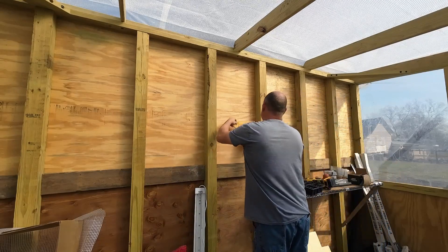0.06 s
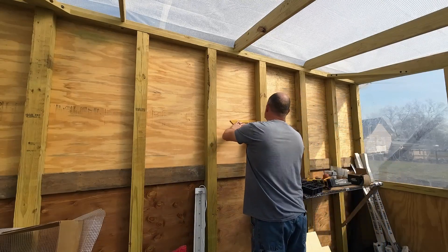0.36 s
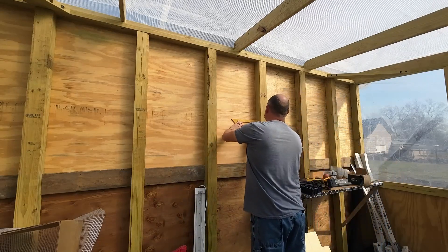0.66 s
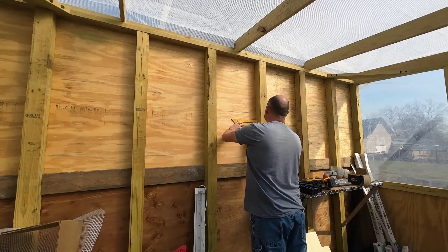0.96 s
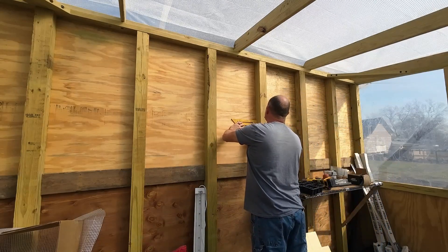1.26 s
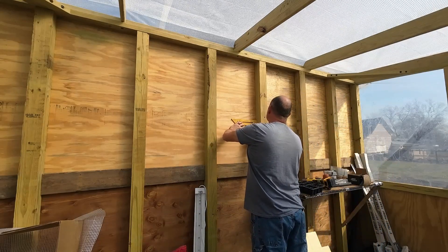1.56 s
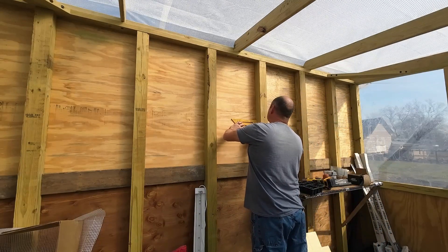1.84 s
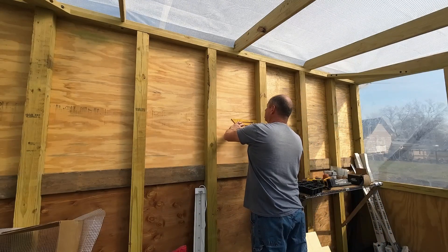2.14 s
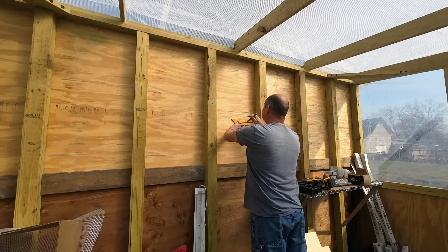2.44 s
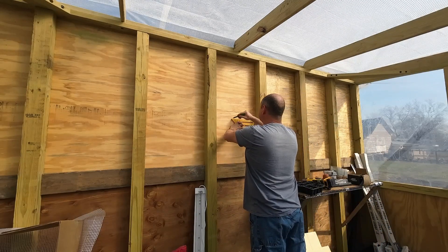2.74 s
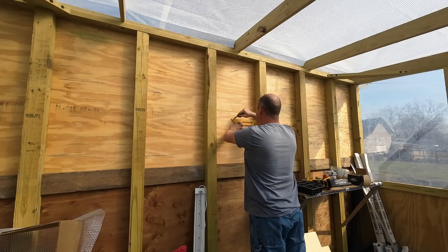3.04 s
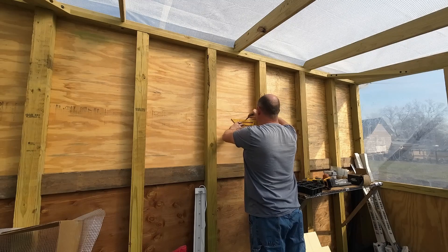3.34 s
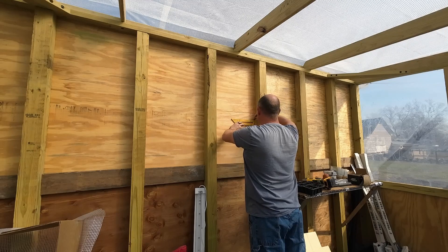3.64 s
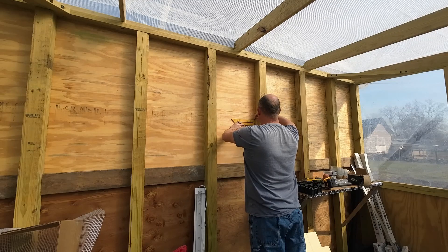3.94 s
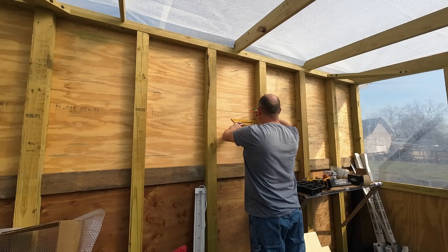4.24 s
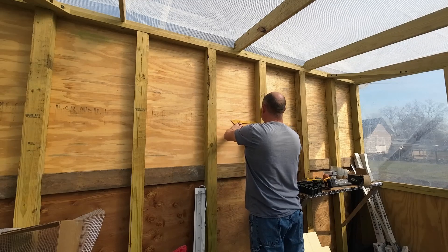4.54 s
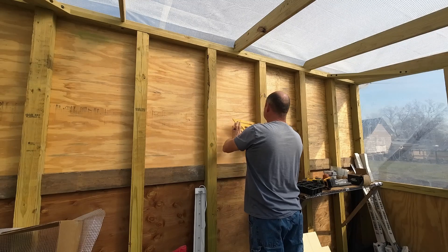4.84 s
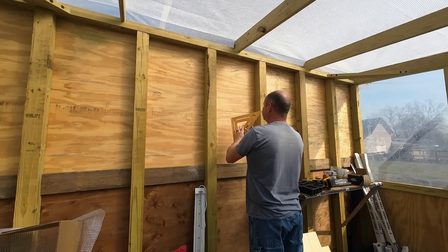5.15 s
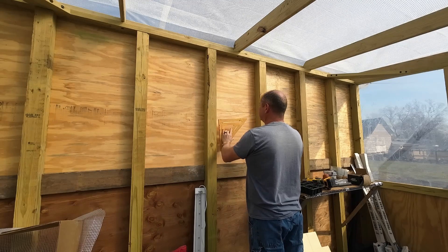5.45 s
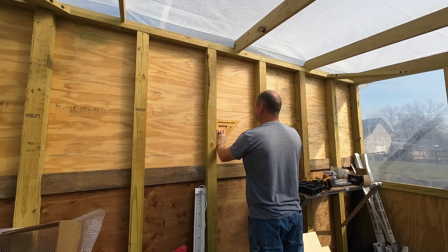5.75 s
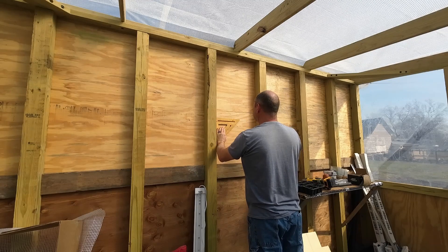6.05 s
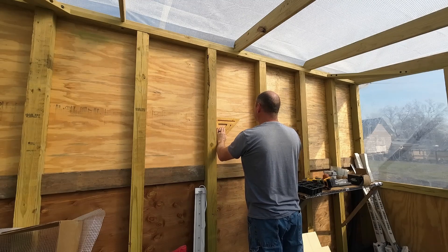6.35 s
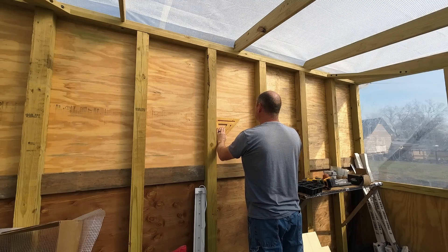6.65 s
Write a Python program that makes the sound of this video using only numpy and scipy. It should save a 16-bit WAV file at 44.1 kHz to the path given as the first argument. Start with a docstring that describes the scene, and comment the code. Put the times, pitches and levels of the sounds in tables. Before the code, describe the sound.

In a small timber greenhouse, heard a few metres from the wall, tools knock and bounce against plywood in two loud bursts, one at the start and one near the end. Between them are light ticks, gentler knocks, a short rasping marker stroke and dry rubs of a tool sliding over the wood. The room rings only briefly. A soft rumble and very faint bird whistles come in from outside.

```python
"""Hand tools knock and clatter on a plywood wall that is being marked out in a small greenhouse.
Each impact excites the damped modes of panel and tool, and the timber room reverberates briefly.
A marker scrapes along the wall and tools slide over it by stick-slip friction; they also tick and
rustle when handled. A low outdoor rumble and faint birds come through the plastic sheeting."""
import sys
import numpy as np
from scipy import signal
from scipy.fft import rfft, irfft, next_fast_len
from scipy.io import wavfile

SR = 44100
rng = np.random.default_rng(int(sys.argv[2]) if len(sys.argv) > 2 else 0)


def waveform_to_disk(signal):
    """Save audio, clipped to [-1, 1], as 16-bit WAV at the path in sys.argv[1]."""
    frames = np.transpose(np.atleast_2d(signal))
    scaled = np.clip(frames, -1, 1) * 32767
    samples = np.round(scaled).astype(np.int16)
    wavfile.write(sys.argv[1], SR, samples)


N = 299865
TIME = np.arange(N) / SR
RING_TIME = TIME[:SR * 4 // 5]  # 0.8 s for a free decay
TOP_HZ = 15800


# impacts on the wall: tools striking, a hand landing (0.503 s) and the marker catching during its stroke
# (3.156-3.475 s): t/s, level/dB, contact cutoff f/Hz, favoured panel f/Hz, weight/dB, favoured tool f/Hz
IMPACTS = [ (0.3971, 11.5, 2570, 520, 2, 2400), (0.414, 20, 5740, 770, 0.5, 2520),
           (0.4412, -2, 3960, 910, 12.5, 3000), (0.4657, 7.5, 5860, 430, 8, 3700),
           (0.4683, 14.5, 2280, 277, -0.5, 3440), (0.4731, 18, 1090, 410, -0.5, 1900),
           (0.503, 10, 300, 300, 6.5, 1900), (0.5487, 6, 910, 452, -1.5, 1900),
           (2.903, -11.5, 4000, 1177, 6.5, 3400), (2.949, 1, 1600, 1100, 4.5, 2000),
           (3.156, -8, 1820, 1120, 6.5, 1900), (3.194, -15, 2385, 504, -1, 4000),
           (3.2198, 8.5, 387, 264, -1.5, 1900), (3.259, -12, 2500, 900, 11.5, 2400),
           (3.289, -12.5, 2740, 1430, 10, 2900), (3.417, -4, 995, 458, 4, 1900),
           (3.475, -10, 1240, 620, 12, 1900), (3.895, -33, 1800, 450, 11, 2376),
           (4.042, -16, 1780, 533, 8.5, 2400), (4.176, -23, 2400, 366, 15, 2400),
           (4.574, 5, 79, 64, 8.5, 1900), (4.736, -15.5, 2380, 471, 9.5, 3400),
           (5.252, -22, 2000, 1000, 8, 2425), (5.6514, 16.5, 1400, 940, 0, 1950),
           (5.674, -2, 3200, 423, 0, 1950), (5.695, 2.5, 400, 420, 6, 1900),
           (5.712, 3, 2000, 470, 9.5, 3400), (5.7368, 22, 595, 527, -15, 1890),
           (5.7404, 6.5, 2520, 673, -6, 3200), (5.752, 7.5, 1920, 514, 1, 3700),
           (5.7625, 5, 784, 600, 10.5, 1900), (5.7778, -3, 3580, 700, 2, 4400)]

def knocks(lowest_hz=55):
    """Impact trains: tools land, bounce and settle, a hand lands and the marker catches; the panel radiates
    little below its lowest mode."""
    out = np.zeros(N)
    for start, *contact in IMPACTS:
        add(out, start, impact(*contact))
    return signal.sosfilt(signal.butter(2, lowest_hz, "high", fs=SR, output="sos"), out)


# modes of the plywood between its studs, and of the tool: f/Hz, level/dB, T60/s before the damping limit
PANEL_MODES = [(61.54, -55, 0.48), (89, -49.5, 0.42), (127, -49.5, 0.18), (165, -56.5, 0.19),
               (276, -48.5, 0.26), (342, -59.5, 0.57), (431, -40, 0.091), (475, -50, 0.099),
               (573, -36.5, 0.023), (634, -56.5, 0.12), (750, -46, 0.1), (803.4, -57, 0.19),
               (905, -54, 0.3), (1051.4, -38.5, 0.015), (1107, -55, 0.54), (1383, -51.5, 0.3),
               (1770, -56.5, 0.17), (1865, -49.5, 0.094)]
TOOL_MODES = [(1898, -46, 0.085), (1960, -42, 0.08), (2356, -38, 0.1), (2483, -44, 0.1), (2615, -45, 0.1),
              (2985, -46, 0.097), (3170, -46, .04), (3398, -48, 0.11), (3680, -49, 0.09), (3990, -45, 0.06),
              (4733, -48, .08)]
# radiation of the panel from a sharp contact: f/Hz, level/dB
CRACK_SPECTRUM = [(40, -21), (120, 1), (260, -0.5), (360, -9), (470, -0.5), (1000, 1.5), (1400, -1.5),
                  (2400, 1.5), (4000, -0.5), (6000, -7), (9500, -6), (12000, -20), (15000, -24)]
# early reflections from studs and roof: delay/s, amplitude ratio
REFLECTIONS = [(.0029, 0.24), (.0062, 0.58), (.0083, .25)]

def impact(db, contact_hz, spot_hz, weight_db, tool_hz, shadow_hz=5600):
    """Impulse excitation: a crack plus panel and tool modes; a softer contact passes less treble."""
    arrivals = np.zeros(len(RING_TIME))
    arrivals[0] = 1
    for delay, gain in REFLECTIONS:
        arrivals[int(delay * SR)] += gain
    # the worker's body shadows the contact, so its treble arrives mostly by way of the room
    shadowed = lowpass(arrivals, shadow_hz, order=4)
    crack = undb(-3) * shadowed + undb(-4) * burst(t60=0.042) + undb(-6) * room_response()
    crack = crack + undb(-1) * band(crack, spot_hz, spot_hz / 3, order=1)  # the spot's broad resonance
    thud_db = 1.5 * (np.array(PANEL_MODES)[:, 0] < 220)  # extra drive for the lowest modes
    panel = ring(PANEL_MODES, coupling_db(PANEL_MODES, spot_hz) + weight_db + thud_db)
    tool_drive_db = -20 + 1.0073 * db  # the harder the blow, the greater the tool's share
    tool = ring(TOOL_MODES, coupling_db(TOOL_MODES, tool_hz) + tool_drive_db)
    return undb(db) * lowpass(colour(crack, CRACK_SPECTRUM) + panel + tool, contact_hz)


def coupling_db(modes, near_hz, peak_db=6):
    """Modal coupling: a contact drives the modes near one frequency most strongly."""
    octaves = np.log2(np.array(modes)[:, 0] / near_hz)
    return peak_db * np.exp(-(2 * octaves) ** 2)


def ring(modes, extra_db):
    """Modal superposition: damped sinusoids from one push, with neighbours in opposite phase."""
    hz, db, t60 = np.transpose(modes)
    gains = undb(db + extra_db) * (-1) ** np.arange(len(modes))
    t60 = np.minimum(t60, 6.5 / np.sqrt(hz))  # damping limit: wood and plastic cannot hold a high note
    return sum(g * decay(t) * np.sin(2 * np.pi * f * RING_TIME) for f, g, t in zip(hz, gains, t60))


# a tool's edge skids after landing: t/s, duration/s, level/dB, f/Hz
EDGE_SKIDS = [(0.411, 0.034, -34.5, 5140), (0.47, 0.035, -51, 3400), (0.512, 0.048, -65, 9500),
              (5.671, 0.04, -53, 6530), (5.673, 0.04, -41, 2650), (5.73, 0.02, -58, 6800)]

def skids():
    """Contact chatter: tiny, rapid bounces merge into short bursts of gritty band noise."""
    chatter, out = friction(rate=2000, scatter_db=1.0), np.zeros(N)
    for start, length, db, hz in EDGE_SKIDS:
        grit = unit(band(chatter, hz, 0.45 * hz, order=3))
        out += undb(db) * gate(start, length, attack_s=0.002, release_s=0.0099) * grit
    return out


# pressure of the marker on the panel: t/s, level/dB
STROKE_PRESSURE = [(3.049, -72), (3.06, -47), (3.14, -51), (3.15, -45), (3.212, -48.5), (3.24, -43),
                   (3.404, -41.5), (3.418, -37), (3.49, -37.5), (3.56, -40.5), (3.654, -41), (3.676, -56.5),
                   (3.698, -45), (3.752, -62)]
# rasp of the wood grain, and fine hiss of a contact: f/Hz, level/dB
GRAIN_SPECTRUM = [(700, -8), (1550, -5.5), (2500, -1), (4000, -10.5), (6000, -18.5), (15000, -55)]
HISS_SPECTRUM = [(2000, -21), (4000, -0.5), (6000, -5.5), (9500, -3), (13000, -12.5), (16000, -25)]

def marker(ordinary_db=-42.5):
    """Sliding friction: with more pressure the panel drones, the grain rasps and the tip hisses louder."""
    times, level_db = np.transpose(STROKE_PRESSURE)
    start, end = times[0], times[-1]
    # the tip catches and runs free, so the pressure is never even
    pressure_db = np.interp(TIME, times, level_db) - ordinary_db + 0.8 * wander(rate=70)
    body = undb(-40.5 + pressure_db) * rubbed_panel(rate=720, scatter_db=2.0)
    rasp = friction_noise(GRAIN_SPECTRUM, rate=720, scatter_db=0.5) + undb(-7) * snags(start, end)
    hiss = friction_noise(HISS_SPECTRUM, rate=4500, scatter_db=6.0)
    # rasp and hiss follow the pressure less closely and fade along the stroke
    elapsed = np.clip(TIME, start, end) - start
    grain = undb(-52.5 + 0.69 * pressure_db - 11 * elapsed) * rasp
    tip = undb(-59 + 0.35 * pressure_db - 15.5 * elapsed) * hiss
    return gate(start, end - start, attack_s=0.1, release_s=0.03) * (moving_contact(body + grain) + tip)


def snags(start, end, rate=140, low_hz=1103, high_hz=5430, scatter_db=8):
    """Elastic release: fibres catch the tip and snap free, each a dry click of its own pitch."""
    out, envelope = np.zeros(N), decay(t60=0.004)[:SR // 20]
    length = end - start
    for when, pitch, size in rng.random((int(rate * length), 3)):
        hz = low_hz * (high_hz / low_hz) ** pitch
        strength = undb(scatter_db * min(-np.log(size), 2)) / np.sqrt(hz)
        click = envelope * np.sin(2 * np.pi * hz * RING_TIME[:len(envelope)])
        add(out, start + when * length, strength * click)
    return unit(out) * np.sqrt(length * SR / N)  # rms 1 within the stroke


def moving_contact(x, swing_db=3):
    """Nodes and antinodes: as the tip passes over them, frequency bands swell and sink independently."""
    size = next_fast_len(N, True)
    parts = split_bands(x, np.geomspace(400, 6000, 14), size)
    return sum(part * undb(swing_db * wander(rate=12)) for part in parts)


# response of the rubbed panel: f/Hz, level/dB
RUBBED_SPECTRUM = [(35, -43), (60, 0), (103, 0), (260, -4.5), (370, -7.5), (500, 2), (620, -4), (720, -4),
                   (946, -7), (1080, -11), (1230, -8), (1420, -11), (2200, -25.5), (2860, -59),
                   (4840, -120)]

def rubbed_panel(rate, scatter_db):
    """Forced vibration: friction drives the panel and its modes into a low drone."""
    slips = friction(rate, scatter_db)
    resonance = signal.fftconvolve(slips, ring(PANEL_MODES, extra_db=0))[:N]
    return unit(colour(slips + undb(-10) * resonance, RUBBED_SPECTRUM))


def friction(rate, scatter_db):
    """Stick-slip: random impulses of uneven size, on average `rate` a second, smeared by the room."""
    slips = (rng.random(N) < rate / SR) * rng.choice([-1., 1.], N)
    slips *= undb(scatter_db * np.minimum(rng.exponential(size=N), 4))
    return unit(slips + signal.fftconvolve(slips, room_response())[:N])


def friction_noise(spectrum, rate, scatter_db):
    """Source and filter: stick-slip impulses take on the spectrum of the contact, at rms 1."""
    return unit(colour(friction(rate, scatter_db), spectrum))


# a tool or hand slides over the wood: t/s, duration/s, rasp level/dB, panel level/dB re rasp
RUBS = [ (0.672, 0.2, -56, 4), (0.835, 0.17, -62.5, 2.5), (1.984, 0.063, -65.5, 7.5),
        (3.875, 0.053, -68.5, 15), (3.974, 0.15, -66, 17.5), (4.156, 0.04, -61.5, 11),
        (4.249, 0.31, -74.5, 19.5), (4.464, 0.4, -53.5, 5), (5.808, 0.075, -66.5, 18.5),
        (5.884, 0.23, -61.5, 10.5), (6.211, 0.14, -66.5, 15.5)]
# dry rubbing on wood: f/Hz, level/dB
RASP_SPECTRUM = [(300, -20), (500, -4), (750, -7), (1200, -1), (1900, 0.5), (2600, 2.5), (3400, 1),
                 (5000, -8.5), (8000, -14.5), (11000, -34), (15000, -51)]

def slides():
    """Dry friction: short rubs swell and stop; a firmer contact couples more strongly to the panel."""
    rasp = friction_noise(RASP_SPECTRUM, rate=1400, scatter_db=1.5)
    rasp += undb(-10) * friction_noise(HISS_SPECTRUM, rate=2000, scatter_db=4.5)
    body, out = rubbed_panel(rate=1400, scatter_db=2.0), np.zeros(N)
    for start, length, db, body_db in RUBS:
        span = slice(int(start * SR), int((start + length) * SR))
        rub = undb(db) * (rasp[span] + undb(body_db) * body[span])
        add(out, start, rub * signal.windows.tukey(len(rub), 0.8))
    return out * undb(wander(rate=60))  # the level flickers


# the sharp snap of a tool striking the wall, and small ticks of tools being handled: t/s, level/dB, f/Hz
BRIGHT_CLICKS = [(0.4146, -1.5, 7000), (0.4653, -18, 9600), (1.055, -32.5, 9700), (2.021, -42.5, 4550),
                 (2.140, -44, 8400), (3.734, -40, 9940), (5.965, -29, 8500)]

def clicks():
    """Contact transients: each is a brief burst of treble followed by the room's reverberation."""
    out = np.zeros(N)
    for start, db, hz in BRIGHT_CLICKS:
        click = burst(t60=0.02) + undb(-8) * room_response()
        add(out, start, undb(db) * band(click, hz, hz / 2))
    return out


# the tool shifts in the hand: t/s, duration/s, level/dB
GRIP_SHIFTS = [(1.977, 0.16, -83), (2.446, 0.11, -82), (2.581, 0.14, -78), (4.161, 0.068, -75),
               (4.254, 0.092, -84), (5.133, 0.13, -70.5), (5.141, 0.27, -70), (5.275, 0.07, -70)]

def rustles():
    """Light friction: the tool turns in the hand, clear of the wall, so only hiss and rasp sound."""
    hiss = friction_noise(HISS_SPECTRUM, rate=7500, scatter_db=2.5)
    rasp = friction_noise(RASP_SPECTRUM, rate=7500, scatter_db=2.5)
    motion = sum(undb(db) * gate(start, length, attack_s=0.0023, release_s=0.035)
                 for start, length, db in GRIP_SHIFTS)
    return (hiss + undb(-5) * rasp) * motion * undb(-0.5 * wander(rate=25.02))


# reverberation time of the greenhouse: f/Hz, T60/s
ROOM_DECAY = [(80, 0.85), (300, 0.28), (1000, 0.17), (3000, 0.26), (8000, 0.24), (15000, .24)]

def room_response():
    """Diffuse field: countless echoes merge into noise, each octave band decaying at its own rate."""
    noise = rng.choice([-1., 1.], len(RING_TIME))
    centres, out = np.geomspace(60, TOP_HZ, 9), 0
    for centre, part in zip(centres, split_bands(noise, centres, len(noise))):
        envelope = decay(on_log(centre, ROOM_DECAY))
        out = out + part * envelope / np.linalg.norm(envelope)
    return out


# outdoor rumble: f/Hz, relative spectrum level/dB
RUMBLE_SPECTRUM = [(15, -39), (25, -12), (63, -0.5), (185, -20), (310, -24.5), (427, -18), (607, -26),
                   (796, -23), (1370, -34), (1890, -34.5), (3080, -38.5), (5570, -55), (9000, -59),
                   (16000, -61)]
# outdoor hums: f/Hz, bandwidth/Hz, level/dB
HUM_BANDS = [(53.5, 4.6, -61.5), (449, 25, -67.5), (3090, 60, -84.5)]

def outdoors():
    """Ambient noise: a broad, gently swelling rumble, with narrow bands that are heard as hums."""
    swell_db = 0.5 * wander(rate=3)
    rumble = undb(-53 + swell_db) * unit(colour(rng.standard_normal(N), RUMBLE_SPECTRUM))
    hums = sum(undb(db) * unit(band(rng.standard_normal(N), hz, width)) for hz, width, db in HUM_BANDS)
    return rumble + hums


# one bird repeats a falling whistle: t/s
WHISTLE_STARTS = [0.581, 0.958, 1.325, 1.705]
# other birds hold level notes: t/s, duration/s, f/Hz
HELD_NOTES = [(0.81, 0.21, 1651), (1.07, .24, 1651), (1.31, 0.2, 1653), (1.495, 0.21, 1654),
              (1.72, 0.19, 1656), (0.98, 0.22, 3005), (1.275, 0.17, 3010), (2.26, 0.22, 3025),
              (6.40, 0.17, 3057), (6.62, .17, 3070)]

def birds(whistle_s=0.17, whistle_hz=(3700, 2300), whistle_db=-77):
    """Distant propagation: wavering pure tones arrive blurred by echoes from trees and houses."""
    out, waver = np.zeros(N), 1 + 0.0017 * wander(rate=67)
    calls = [(start, whistle_s, *whistle_hz, whistle_db) for start in WHISTLE_STARTS]
    for start, length, hz in HELD_NOTES:
        calls.append((start, length, hz, hz, -69.5 - 8 * np.log2(hz / 1660)))  # high notes carry less far
    for start, length, from_hz, to_hz, db in calls:
        drift = waver[int(start * SR):int((start + length) * SR)]
        hz = np.geomspace(from_hz, to_hz, len(drift)) * drift
        tone = np.sqrt(2) * np.sin(2 * np.pi * np.cumsum(hz) / SR)
        add(out, start, undb(db) * signal.windows.tukey(len(tone), 0.7) * tone)
    out *= undb(2 * wander(rate=60))  # the level flutters
    return out + undb(-4) * signal.fftconvolve(out, burst(t60=0.7))[:N]


def undb(db):
    """Level to amplitude ratio."""
    return 10 ** (np.asarray(db) / 20)


def unit(x):
    """Normalisation to rms 1."""
    return x / np.sqrt(np.mean(x ** 2))


def add(out, start_s, sound):
    """Superposition of a sound from a given time on."""
    start = int(start_s * SR)
    out[start:start + len(sound)] += sound[:N - start]


def on_log(hz, points):
    """Interpolation of (f/Hz, value) points on a log-frequency axis."""
    knots, values = np.transpose(points)
    return np.interp(np.log(np.maximum(hz, 1)), np.log(knots), values)


def colour(x, points, size=8192):
    """Minimum-phase filter with a (f/Hz, level/dB) response."""
    gain = undb(on_log(np.fft.rfftfreq(size, 1 / SR), points))
    cepstrum = irfft(np.log(gain))
    cepstrum[1:size // 2] *= 2  # folding the cepstrum makes the filter causal
    cepstrum[size // 2 + 1:] = 0
    return signal.fftconvolve(x, irfft(np.exp(rfft(cepstrum))))[:len(x)]


def split_bands(x, centres, size):
    """Complementary filter bank: overlapping bands that sum to the input."""
    hz, spectrum = np.fft.rfftfreq(size, 1 / SR), rfft(x, size)
    for share in np.eye(len(centres)):
        yield irfft(spectrum * on_log(hz, np.c_[centres, share]), size)[:len(x)]


def band(x, hz, width, order=2):
    """Band-pass filter about a centre frequency."""
    edges = np.clip([hz - width / 2, hz + width / 2], 10, SR / 2 - 10)
    return signal.sosfilt(signal.butter(order, edges, "band", fs=SR, output="sos"), x)


def lowpass(x, hz, order=2):
    """Attenuation above a cutoff frequency."""
    return signal.sosfilt(signal.butter(order, min(hz, TOP_HZ), fs=SR, output="sos"), x)


def decay(t60):
    """Exponential decay, 60 dB down after t60."""
    return np.exp(-np.log(1000) * RING_TIME / t60)


def burst(t60):
    """Dense resonances or echoes as decaying white noise of unit energy."""
    envelope = decay(t60)
    return rng.choice([-1., 1.], len(RING_TIME)) * envelope / np.linalg.norm(envelope)


def wander(rate):
    """Random modulation with a spread near 1 and `rate` new values a second."""
    knots = rng.standard_normal(4096)
    return np.interp(TIME * rate, np.arange(len(knots)), knots)


def gate(start, length, attack_s, release_s):
    """Trapezoidal envelope: rise, hold and fall."""
    return np.clip(np.minimum((TIME - start) / attack_s, (start + length - TIME) / release_s), 0, 1)


def scene():
    """Linear superposition of all sources at one point, a few metres from the wall."""
    return (knocks() + skids() + clicks() + marker() + slides() + rustles() + outdoors() + birds())[None]


def record(dry):
    """Overload and band limiting: peaks beyond full scale are flattened, then the top treble is cut."""
    treble_cut = signal.ellip(8, 0.2, 70, TOP_HZ, fs=SR, output="sos")
    return signal.sosfilt(treble_cut, np.clip(dry, -1, 1))


dry = scene()
out = record(dry)
waveform_to_disk(out)
```